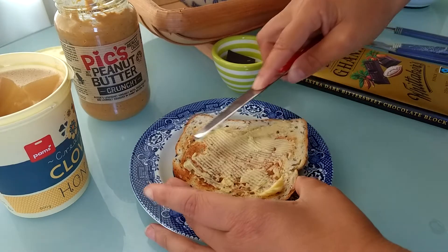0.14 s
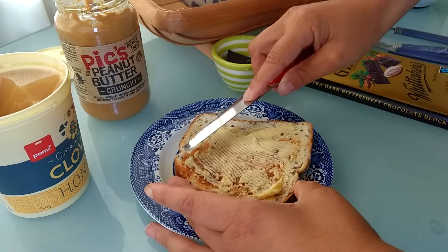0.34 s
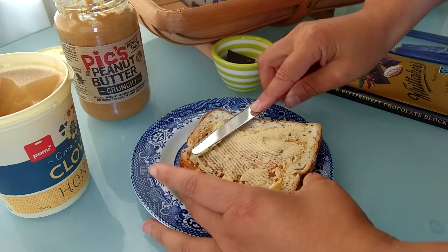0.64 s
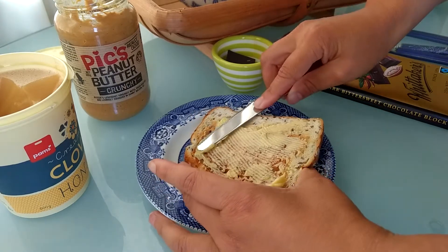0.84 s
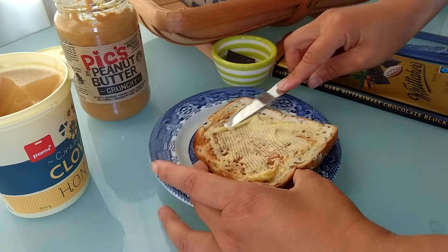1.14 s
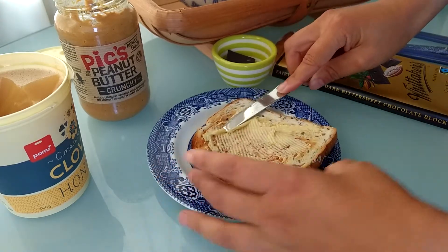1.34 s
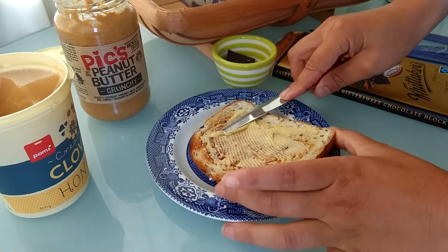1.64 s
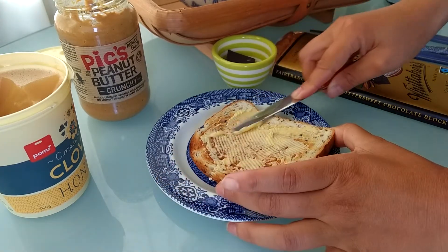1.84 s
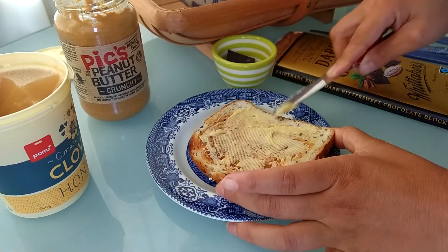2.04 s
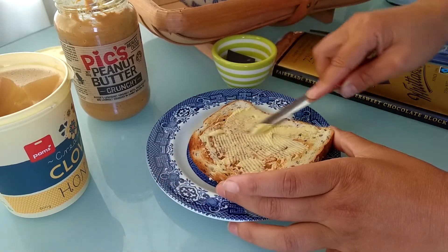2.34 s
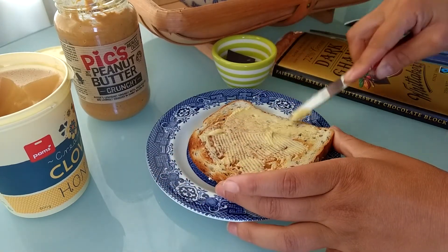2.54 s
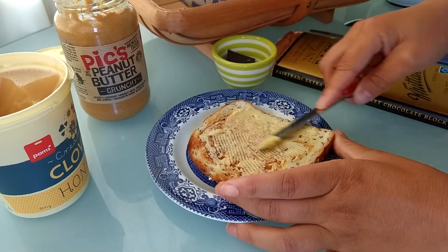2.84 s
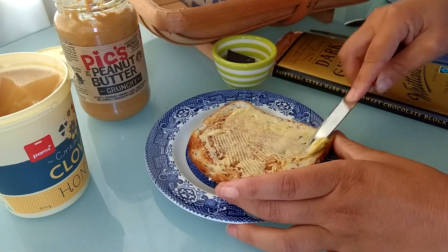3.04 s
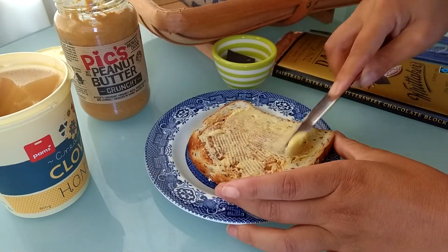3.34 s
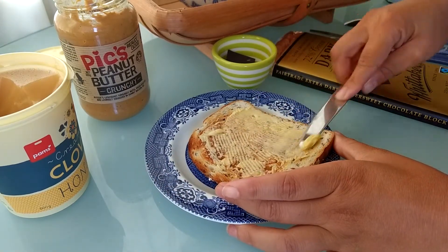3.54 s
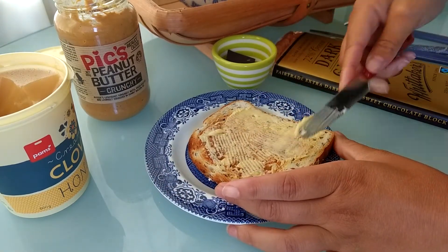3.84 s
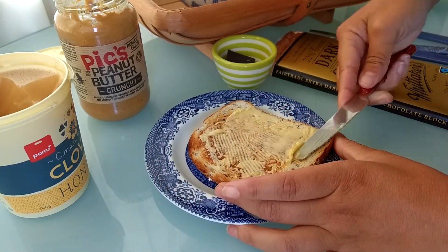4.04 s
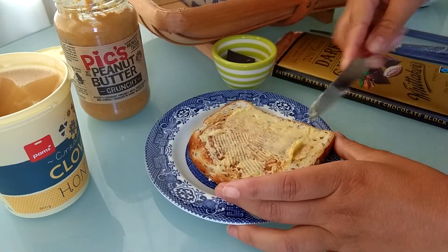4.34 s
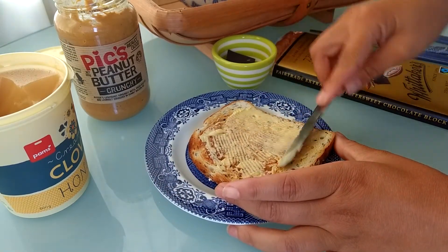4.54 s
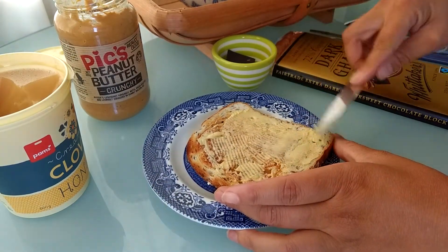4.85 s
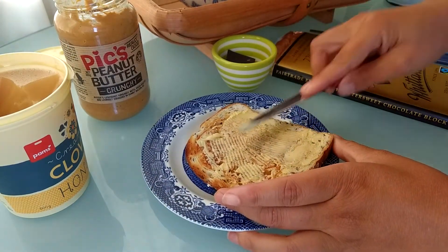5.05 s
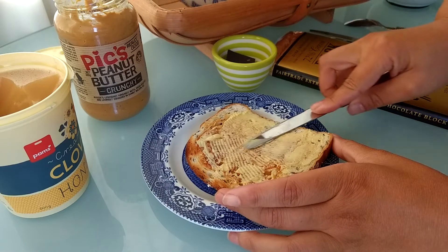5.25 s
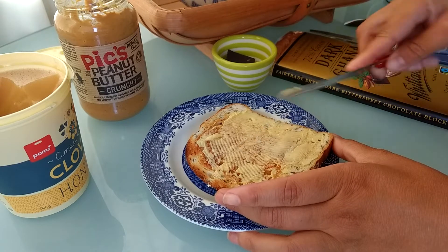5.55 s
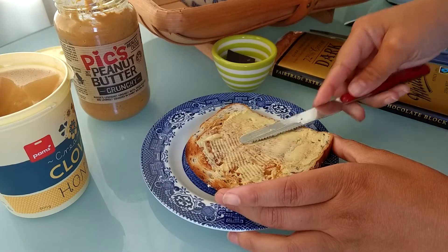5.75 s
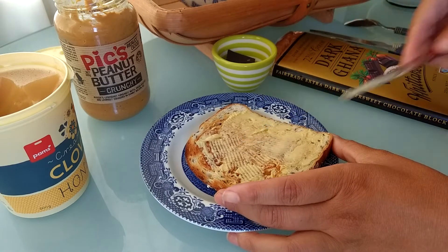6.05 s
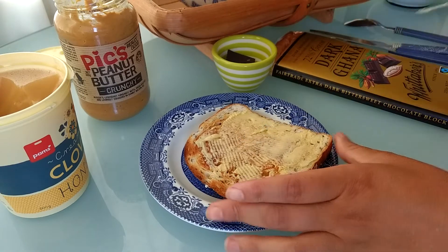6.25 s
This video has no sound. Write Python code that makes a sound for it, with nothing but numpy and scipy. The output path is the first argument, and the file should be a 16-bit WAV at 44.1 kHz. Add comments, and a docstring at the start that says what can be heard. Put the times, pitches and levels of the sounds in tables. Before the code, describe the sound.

A table knife scrapes crisp buttered toast in short crunchy strokes while the china plate knocks dully on the table in a quiet kitchen.

```python
"""Throughout, a soft hiss swells and fades again and again over a quiet kitchen, whose low background slowly grows.
From half a second on, a china plate knocks on the table: a blunt push, ringing modes and scattered reflections.
Soon a table knife spreads butter on dry toast: strokes crunch as clumps of tiny fractures and snap crumbs.
The pressure rocks the plate, and from about one second on the blade at times touches the china: a tick with rings.
Two microphone openings pick it all up, and loud treble turns the gain down for a while."""
import sys
import numpy as np
from scipy import signal
from scipy.fft import rfft, irfft
from scipy.io import wavfile

SR = 44100
rng = np.random.default_rng(int(sys.argv[2]) if len(sys.argv) > 2 else 0)


def transcribe(u):
    """Save the signal u as a 16-bit wav file named by the first command-line argument.

    u: samples, shape (n,) or (channels, n), limited to [-1, 1]; the rate is SR.
    q: integer samples, one column per channel.
    """
    v = np.clip(np.atleast_2d(u).T, -1, 1)
    q = np.round(v * 32767).astype(np.int16)
    wavfile.write(sys.argv[1], SR, q)


N = 282240

# Levels in the tables are relative: the functions may add a gain for each layer.
# The plate knocks on the table: t/s, level/dB, hardness (treble against body)/dB
PLATE_KNOCKS = [(0.552, -25.5, -34), (0.581, -27.5, -41), (1.145, 0, -18), (1.839, -30.5, -34),
                (2.016, -18, -23), (2.364, -27, -21), (2.453, -21.5, -29), (2.53, -13, -28),
                (2.864, -6.5, -22.5), (2.876, -15, -19), (3.126, -33, -44), (3.384, -29.5, -29),
                (3.474, -11.5, -6), (3.481, -6.5, -32), (3.629, -16.5, -33), (3.662, -21, -32),
                (4.094, -29.5, -36), (4.215, -16, -30.5), (4.707, -13.5, -34), (4.794, -22.5, -39.5),
                (5.195, -13.5, -29), (5.433, -14, -30), (5.738, -41, -62), (5.82, -31.5, -37),
                (5.888, -24, -28), (5.966, -20.5, -36), (6.175, -17.5, -29.5)]
# The blade touches the china: t/s, level/dB, damping of the long rings by the pressing blade/dB
BLADE_TOUCHES = [(1.148, -16.5, -5), (3.48, -25, -28), (5.113, -41, -30), (5.194, -37, -22),
                 (5.238, -31.5, -34), (5.434, -35.5, -28)]
# Large crumbs snap under the blade: t/s, level/dB, toast body against the snap/dB
LARGE_CRUMBS = [(0.6739, -38, -22), (0.7815, -36, -2), (0.979, -26.5, -1), (1.047, -23, 1.5),
                (1.2928, -26, -36), (1.7253, -33.5, -6), (1.8043, -34.5, -21), (1.9113, -18.5, 8),
                (1.9638, -27.5, -19), (2.3396, -34, 11), (2.431, -28, -8), (2.5013, -31, 8.5),
                (2.7786, -22.5, 2), (2.8955, -17.5, -23), (2.955, -37.5, 7), (3.0541, -25.5, 1.5),
                (3.0971, -20, 3), (3.1168, -29, 3), (3.5767, -30.5, 6), (3.5857, -33.5, 0),
                (4.1647, -36, -5.5), (4.5489, -33.5, 10), (4.6738, -33, 3), (4.776, -32, 3),
                (5.3427, -30.5, -15), (5.354, -35.5, 15), (5.3758, -39, 20.5), (5.805, -39.5, 10.5),
                (5.89, -28, -15), (5.9274, -29, 2.5)]
# Strokes of the blade: start t/s, build-up length/s, easing length/s,
# crunch level at the hardest press/dB, toast body against the crunch/dB
BLADE_STROKES = [(0.675, 0.41, .07, -58, -6), (1.719, 0.2, 0.1, -51.5, 2), (2.331, 0.11, 0.12, -55.5, 7),
                 (2.768, 0.079, 0.12, -40, 1.5), (2.98, 0.13, 0.024, -54.5, 4),
                 (3.511, 0.072, 0.097, -54.5, 2), (4.134, 0.0208, 0.051, -51, 3),
                 (4.669, 0.017, 0.11, -57.5, 11), (5.215, 0.018, 0.12, -54.5, 0),
                 (5.803, 0.084, 0.036, -59.5, 11)]
# Soft swells of hiss: t at the top/s, length/s, level/dB
HISS_SWELLS = [(0.13, 0.21, -66), (0.402, 0.51, -68.5), (1.02, 1, -67), (1.43, 0.71, -56.5),
               (2.2, 0.12, -63.5), (2.703, 0.23, -60), (3.75, .3, -70.5), (4.45, 0.47, -72),
               (5.013, 0.34, -63), (5.32, 0.36, -58), (5.631, 0.31, -57.5), (6.046, 0.4, -54),
               (6.385, 0.72, -53)]
# Modes of the plate on the table: f/Hz, level/dB, time to fall by 60 dB/s
PLATE_MODES = [(327.6, -17, 0.18), (441, -17.5, 0.25), (583, -15, 0.13), (665, -3, 0.16), (742, -4.5, 0.21),
               (858, -3, 0.09), (941, -4.5, 0.17), (1132, -0.5, 0.16), (1195.5, 6.5, 0.069),
               (1298, 0.5, 0.083), (1458, -1, 0.1), (1577, 0, 0.052), (1640, -3, 0.096), (1895, -3, .11),
               (2150, -15.5, .1), (2495, -5.5, 0.14), (2823, -5, 0.074), (3025, -3, 0.052),
               (3400, -9, 0.072)]
# Rings of the china, each a cluster of close modes:
# f/Hz, level/dB, time to fall by 60 dB/s, spread/share of the pitch
CHINA_RINGS = [(3712, 2, .22, 0), (5200, -9, .07, .025), (7100, -12, .1, .008), (9400, -18, .05, .02),
               (11500, -18, .07, .02), (14300, -19, .08, .04)]
# Spectrum of a plate knock: f/Hz, level/dB
THUD_SPECTRUM = [(20, -73), (100, -16), (330, -15), (500, -6), (700, 3), (1000, -6), (1250, 3), (1700, -3),
                 (2200, -3.5), (3200, -11.5), (4200, -19.5), (5300, -16.5), (8000, -36.5), (16000, -47)]
# Spectrum of a breaking crumb, also used for steel on china: f/Hz, level/dB
CRUMB_SPECTRUM = [(200, -20.5), (1000, 1), (2200, -4), (3200, 2), (4200, 0), (5500, -2.5), (8000, -6.5),
                  (10000, -2), (11500, -5.5), (16000, -4.5)]
# Spectrum of the sound that comes through the slice of toast: f/Hz, level/dB
TOAST_SPECTRUM = [(20, -40.5), (80, -10), (200, -5.5), (400, -8), (650, -1), (900, 9), (1150, 3.5),
                  (1500, 2), (2200, -6.5), (3200, -3.5), (4200, -12), (8000, -24.5), (16000, -42)]
# Spectrum of the soft hiss: f/Hz, level/dB
HISS_SPECTRUM = [(100, -5), (400, -7.5), (1000, 1), (2000, -1), (3300, -1), (5500, -5), (8000, -8.5),
                 (12000, -8.5), (16000, -9)]
# Spectrum of the quiet kitchen: f/Hz, level/dB
KITCHEN_SPECTRUM = [(20, -32.5), (45, -10.5), (68, 1.5), (100, -3.5), (160, -2), (260, -5), (500, -11),
                    (1200, -16), (2200, -24), (4000, -29.5), (16000, -66)]
# How alike steady noise is at the two microphone openings (ports): f/Hz, likeness/share
PORT_LIKENESS = [(30, 0.12), (150, 0.049), (400, 0.22), (800, 0.8), (2000, 0.96), (16000, 0.69)]
# Left port against the right: f/Hz, level/dB
PORT_BALANCE = [(40, 17), (130, 1), (1500, 0.5), (2200, -1), (3200, -1), (4400, -1), (5500, -1.5),
                (7000, -2.5), (9500, -2.5), (12000, -6.5), (16000, -7)]
# How far the right port leads the left: f/Hz, phase/rad
PORT_LEAD = [(0, 0), (1200, 0), (1550, .7), (2170, np.pi), (16400, 43.3)]

EDGE_HZ = 15950  # top of the band
# A light or soft knock is mostly a blunt push, a strong one more of a clack:
# dB for each dB away from the usual knock
USUAL_KNOCK_DB, BLUNT_PER_LEVEL, BLUNT_PER_HARDNESS, CLACK_PER_LEVEL = -24, -.02, -.25, 0.121
# The press builds from the touch and eases before the blade lifts: dB against the hardest press
TOUCH_DB, LIFT_DB = -9, -8.5
# Small crumbs: how many a second, their level over the crunch, and its scatter
CRUMBS_PER_S, CRUMB_OVER_DB, CRUMB_SCATTER_DB = 22, 17, 3
# The hiss between the swells, and how far a swell has fallen at its ends
HISS_REST_DB, SWELL_ENDS_DB = -69, -16
# A snap: its small cracks against the main one (share), and how fast they die (s)
CRUMBLE, CRUMBLE_S = 1.7, .0012


def gain_of(db):
    """Turns decibels into an amplitude."""
    return 10 ** (np.asarray(db) / 20)


def unit(x):
    """Scales a sound to an energy of one."""
    return x / np.sqrt(np.sum(x ** 2, -1, keepdims=True) + 1e-20)


def read(points, hz):
    """Reads a table between its points, on a log-frequency axis."""
    f, value = np.transpose(points)
    return np.interp(np.log(hz + 1), np.log(f + 1), value)


def add(mix, s, sound):
    """Mixes a sound in at s seconds."""
    part = mix[..., round(s * SR):][..., :sound.shape[-1]]
    part += sound[..., :part.shape[-1]]


def through(x, response):
    """Sends a sound through a response (convolution in time) and keeps its length."""
    return signal.fftconvolve(np.atleast_2d(x), np.atleast_2d(response), axes=1)[:, :x.shape[-1]]


def tilt(hz, hardness_db, clack_db, bass_share=0.32):
    """A harder blow gives more treble and less bass; a clack favours the middle modes over the low ones."""
    hard = read([(150, -bass_share), (1100, 0.019), (2900, 0.42)], hz)
    clack = read([(780, -1.1), (1150, 0.77), (1900, -0.12), (2900, 0.58)], hz)
    return hardness_db * hard + clack_db * clack


def click(spectrum, tilt_db=0, clack_db=0, size=4096):
    """A click with a given spectrum and hardness, whose energy comes as early as it can."""
    hz = abs(np.fft.fftfreq(size, 1 / SR))
    log_gain = np.log(gain_of(read(spectrum, hz) + tilt(hz, tilt_db, clack_db)))
    # the phase that belongs to this gain lets nothing sound before the blow (minimum phase)
    gain_and_phase = np.exp(np.conj(signal.hilbert(log_gain)))
    return unit(np.fft.ifft(gain_and_phase).real[:size // 2])


def tail(t60, apart, bass_apart=2.4, bass_hz=260, size=13000):
    """Dying scatter of reflections, partly different at each port, most of all in the bass."""
    t = np.arange(size) / SR
    shared, side = rng.standard_normal((2, size))
    bass_filter = signal.butter(3, bass_hz, fs=SR, output="sos")
    side = apart * side + bass_apart * signal.sosfilt(bass_filter, side)
    fade = gain_of(-60 * t / t60) * (1 - np.exp(-t / 0.00057))
    return unit((shared + np.array([side, -side])) * fade)


def air(spectrum):
    """Steady noise with an rms of one, whose bass differs between the ports."""
    hz = np.fft.rfftfreq(N, 1 / SR)
    a, b = rfft(rng.standard_normal((2, N)))
    same = np.clip(read(PORT_LIKENESS, hz), -1, 1)
    ports = np.array([a, same * a + np.sqrt(1 - same ** 2) * b])
    noise = irfft(ports * gain_of(read(spectrum, hz)), N)
    return noise / noise.std()


def kitchen(level_db=-61, rise_db=3):
    """The quiet kitchen: mostly low, steady noise whose level climbs evenly in dB."""
    t = np.arange(N) / SR
    return gain_of(level_db + rise_db * t / t[-1]) * air(KITCHEN_SPECTRUM)


def hiss():
    """A faint steady hiss with smooth swells that all share one arch."""
    t = np.arange(N) / SR
    power = gain_of(HISS_REST_DB) ** 2
    for top, length, level_db in HISS_SWELLS:
        arch_db = SWELL_ENDS_DB * (2 * (t - top) / length) ** 2
        power = power + gain_of(level_db + arch_db) ** 2
    return np.sqrt(power) * air(HISS_SPECTRUM)


def knocks(push_db=2.5, push_tilt_db=-6, ring_db=10.5, scatter_db=7, scatter_t60=0.11, room_db=-6,
           usual_hardness_db=-19, spot_db=2, detune=0.018, lag_s=0.0015, size=13000):
    """The foot of the plate hits the table: a blunt push, the plate's modes, and scatter from the table top."""
    out, t = np.zeros((2, N)), np.arange(size) / SR
    hz, mode_db, t60 = np.transpose(PLATE_MODES)[:, :, None]
    for s, level_db, hardness_db in PLATE_KNOCKS:
        stronger_db = level_db - USUAL_KNOCK_DB
        harder_db = hardness_db - usual_hardness_db
        tilt_db, clack_db = 1.39 * harder_db, CLACK_PER_LEVEL * stronger_db
        blunt_db = BLUNT_PER_LEVEL * stronger_db + BLUNT_PER_HARDNESS * harder_db
        # the spot that lands and the grip of the hand weight and bend the modes anew each time
        spot, bend, turn = rng.standard_normal((3, len(PLATE_MODES), 1))
        heights = gain_of(mode_db + spot_db * spot + tilt(hz, tilt_db, clack_db) - 60 * t / t60)
        waves = np.sin(2 * np.pi * (hz * (1 + detune * bend) * t + turn))
        ring = unit((heights * waves).sum(0) * (1 - np.exp(-t / 0.002)))
        scatter = gain_of(scatter_db) * tail(scatter_t60, 0.38) + gain_of(room_db) * tail(0.43, 0.34)
        scattered = through(scatter, click(THUD_SPECTRUM, tilt_db, clack_db))
        push = click(THUD_SPECTRUM, tilt_db + push_tilt_db, clack_db)
        add(out, s + lag_s, gain_of(level_db) * (scattered + gain_of(ring_db) * ring))
        add(out, s + lag_s, gain_of(level_db + push_db + blunt_db) * push)
    return out


def clinks(tick_db=3, splash_db=0, splash_t60=0.064, count=7):
    """Steel on china: a hard tick, a short splash, one clear ring and rough clusters above it."""
    out, t = np.zeros((2, N)), np.arange(SR // 3) / SR
    for s, level_db, damping_db in BLADE_TOUCHES:
        add(out, s, gain_of(level_db + tick_db) * click(CRUMB_SPECTRUM))
        splash = through(tail(splash_t60, .4), click(CRUMB_SPECTRUM))
        add(out, s, gain_of(level_db + splash_db) * splash)
        for hz, db, t60, spread in CHINA_RINGS:
            # the pressing blade damps the long rings, not the short ones
            long_ring = np.interp(t60, [.07, .2], [0, 1])
            pitches = hz * (1 + spread * rng.uniform(-1.7, 1, (count, 1)))
            cluster = np.sin(2 * np.pi * pitches * t).mean(0)
            add(out, s, gain_of(level_db + db + damping_db * long_ring - 60 * t / t60) * cluster)
    return out


def press(since_s, build_s, ease_s):
    """How hard the blade presses during a stroke, in dB against its hardest."""
    return np.interp(since_s, [0, build_s, build_s + ease_s], [TOUCH_DB, 0, LIFT_DB])


def small_crumbs(count=16):
    """Snaps at random moments of each stroke that follow the press; rows as for the large crumbs."""
    rows = []
    for start, build_s, ease_s, level_db, toast_db in BLADE_STROKES:
        since_s = (np.arange(count) + rng.random(count)) / CRUMBS_PER_S
        size_db, colour_db = CRUMB_SCATTER_DB * rng.standard_normal((2, count))
        snap_db = level_db + press(since_s, build_s, ease_s) + CRUMB_OVER_DB + size_db
        crumbs = np.transpose([start + since_s, snap_db, toast_db + colour_db])
        rows += list(crumbs[since_s < build_s + ease_s])
    return rows


def snaps(snap_db=10, body_db=8, build_s=0.00079, body_crumble=0.62, lag_s=.0012, size=600):
    """A crumb gives way: small cracks build up to one sharp snap and die out again, jolting the slice."""
    cracks, jolts = np.zeros(N), np.zeros(N)
    t = (np.arange(size) - size // 2) / SR  # zero at the main snap
    for s, level_db, toast_db in [*LARGE_CRUMBS, *small_crumbs()]:
        swell = np.exp(np.minimum(t / build_s, -t / CRUMBLE_S))
        small_cracks = unit(rng.standard_normal(size) ** 3 * swell)
        begin = s + lag_s + t[0]
        add(cracks, begin, gain_of(level_db) * unit((t == 0) + CRUMBLE * small_cracks))
        add(jolts, begin, gain_of(level_db + toast_db) * unit((t == 0) + body_crumble * small_cracks))
    direct = gain_of(snap_db) * through(cracks, click(CRUMB_SPECTRUM))
    return direct + gain_of(body_db) * through(jolts, click(TOAST_SPECTRUM))


def scrape(crunch_db=0, body_db=1, grains_per_s=3500, thinning=.9, spread_db=5.0, clump_db=4.5,
           clump_s=.003, edge_s=0.016):
    """The blade drags over the crust: tiny fractures in clumps, heard directly and through the slice."""
    t, crunch, body = np.arange(N) / SR, np.zeros(N), np.zeros(N)
    for start, build_s, ease_s, level_db, toast_db in BLADE_STROKES:
        since_s = t - start
        contact = np.clip(np.minimum(since_s, build_s + ease_s - since_s) / edge_s + .5, 0, 1)
        force = contact * gain_of(level_db + press(since_s, build_s, ease_s))
        crunch += force
        body += force * gain_of(toast_db)
    clumps = np.interp(t / clump_s, np.arange(N), np.clip(rng.standard_normal(N), -2, 2))
    sizes = gain_of(spread_db * np.minimum(rng.exponential(1, N), 3) + clump_db * clumps)
    # a light touch breaks single crumbs, a hard one many at once
    busy = np.maximum(crunch / crunch.max(), .012) ** thinning
    chance = busy * grains_per_s / SR
    fractures = sizes * rng.choice([-1, 1], N) * (rng.random(N) < chance)
    # even out the power, so that how many break does not change the average level
    grains = fractures / np.sqrt(chance * np.mean(sizes ** 2))
    direct = gain_of(crunch_db) * through(crunch * grains, click(CRUMB_SPECTRUM))
    return direct + gain_of(body_db) * through(body * grains, click(TOAST_SPECTRUM))


def scene(near_db=-9, room_db=-18, hiss_db=1):
    """Toast and china with their reflections, the knocking plate, the kitchen and the hiss."""
    background = kitchen() + gain_of(hiss_db) * hiss()
    reflections = gain_of(near_db) * tail(0.077, 0.5) + gain_of(room_db) * tail(0.16, 0.43)
    plate = knocks()
    close = clinks() + scrape() + snaps()
    return close + through(close, reflections) + plate + background


def gain_control(x):
    """Loud treble turns the gain down, and it creeps back up."""
    threshold_db, slope, recovery_db_per_s, attack_s = -42, .62, 10, .035
    treble = signal.sosfilt(signal.butter(4, 3400, "high", fs=SR, output="sos"), x)
    r = np.exp(-1 / (attack_s * SR))
    power = signal.lfilter([1 - r], [1, -r], (treble ** 2).mean(0))
    power_db = 10 * np.log10(power + 1e-12)
    wanted_cut_db = slope * np.maximum(power_db - threshold_db, 0)
    # hold the deepest cut so far, less what has crept back since
    creep = np.arange(N) * recovery_db_per_s / SR
    cut_db = np.maximum.accumulate(wanted_cut_db + creep) - creep
    return x * gain_of(-signal.lfilter([1 - r], [1, -r], cut_db))


def record(dry, offset_db=-43.0):
    """The ports shift and tilt the treble, the left gets a small offset; then gain control and band limit."""
    hz = np.fft.rfftfreq(N, 1 / SR)
    # each port takes half of the level and phase difference
    half_lead = np.exp(-.5j * np.interp(hz, *np.transpose(PORT_LEAD)))
    half = gain_of(read(PORT_BALANCE, hz) / 2) * half_lead
    ports = irfft(rfft(dry) * np.array([half, 1 / half]), N)
    ports[0] += gain_of(offset_db)
    low_pass = signal.firwin(401, EDGE_HZ, window=("kaiser", 8), fs=SR)
    return signal.oaconvolve(gain_control(ports), low_pass[None], "same", axes=1)


dry = scene()
out = record(dry)
transcribe(out)
```